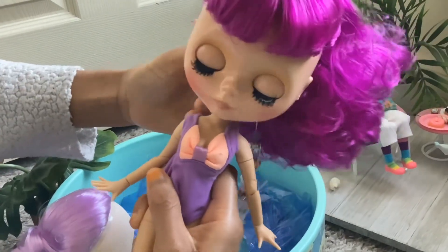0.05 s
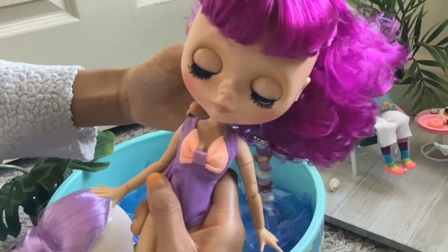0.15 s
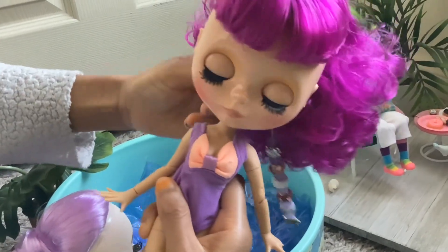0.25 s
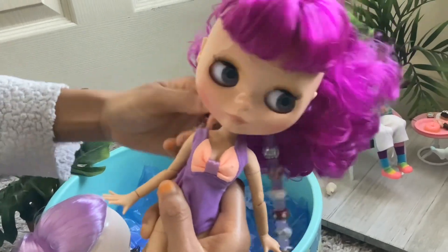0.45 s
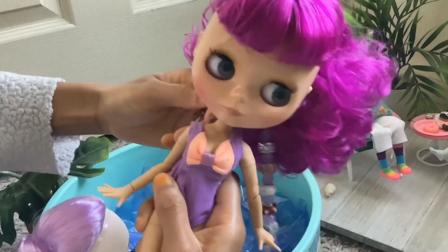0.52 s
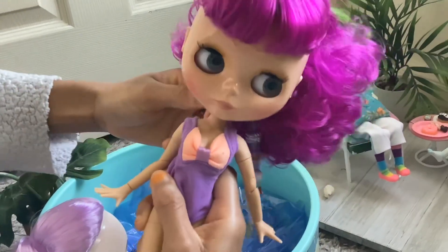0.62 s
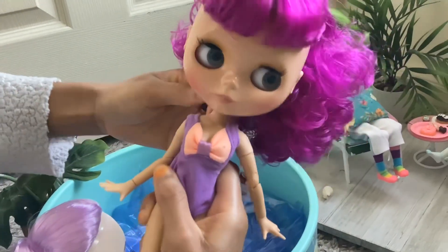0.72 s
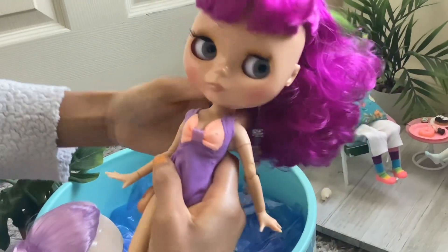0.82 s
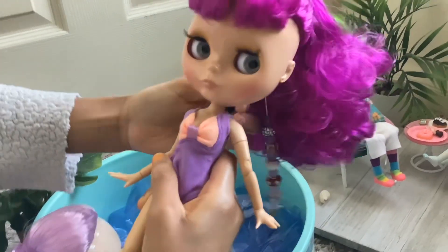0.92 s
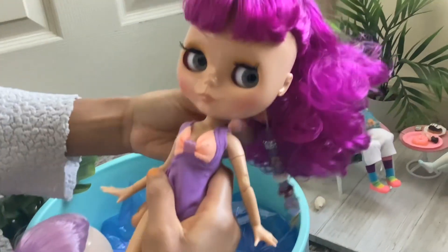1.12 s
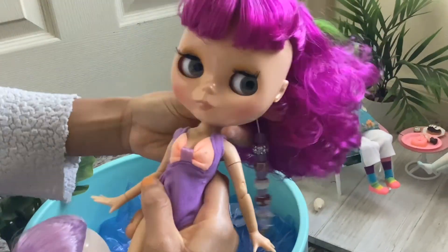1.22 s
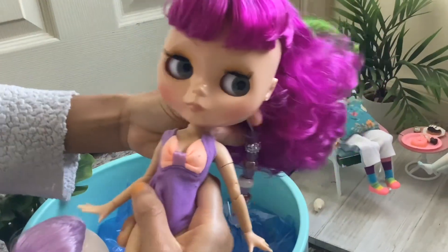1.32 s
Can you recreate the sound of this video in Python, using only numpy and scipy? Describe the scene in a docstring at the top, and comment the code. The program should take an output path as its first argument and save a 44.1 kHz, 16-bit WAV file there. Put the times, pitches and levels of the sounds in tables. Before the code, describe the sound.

Hard plastic clack of a doll's eye mechanism, after faint string ticks and a tiny squeak

```python
"""The eyes of a doll snap open and rattle its hollow head, as a hand pulls the string, close by in a
quiet room. Each contact is a crack, a dying burst of noise and the ringing modes of the shell.
A cam squeaks by stick-slip, a pawl drops back with short pings, and the string ticks and rubs as
noise grains. Light ticks and a soft bump with a sagging pitch follow.
Below lie scattered reflections, shaped noise for the room's rumble and hiss, and a wavering hum."""
import sys
import numpy as np
from scipy import signal
from scipy.fft import rfft, irfft
from scipy.io import wavfile
from scipy.ndimage import uniform_filter1d

SR = 44100
rng = np.random.default_rng(int(sys.argv[2]) if len(sys.argv) > 2 else 0)


def waveform_to_disk(signal):
    """Save audio, clipped to [-1, 1], as 16-bit WAV at the path in sys.argv[1]."""
    frames = np.transpose(np.atleast_2d(signal))
    scaled = np.clip(frames, -1, 1) * 32767
    samples = np.round(scaled).astype(np.int16)
    wavfile.write(sys.argv[1], SR, samples)


N = 59535  # samples, 1.35 s


def amp(db):
    """Level law: decibels to an amplitude gain."""
    return 10 ** (np.asarray(db) / 20)


def unit(x):
    """Energy normalisation: scales the sum of squares to 1."""
    return x / np.sqrt(np.sum(x ** 2) + 1e-20)


def evened(x):
    """Power normalisation: scales the rms to 1."""
    return unit(x) * np.sqrt(x.size)


def read(points, hz):
    """Logarithmic frequency scale: interpolates a spectrum along it."""
    f, value = np.transpose(points)
    return np.interp(np.log(hz + 1), np.log(f + 1), value)


def add(mix, s, sound):
    """Superposition: adds a sound to the mix from time s."""
    part = mix[max(round(s * SR), 0):][:len(sound)]
    part += sound[:len(part)]


def wander(size, hz):
    """Low-passed noise: slow random motion of rms 1, with little above the given rate."""
    f = np.fft.rfftfreq(N, 1 / SR)
    smooth = rfft(rng.standard_normal(N)) / (1 + (f / hz) ** 4)
    return evened(irfft(smooth, N))[:size]


def causal(gain_db):
    """Minimum phase: the Hilbert transform of the log gain gives a response with no pre-echo."""
    log_gain = np.log(amp(np.r_[gain_db, gain_db[-2:0:-1]]))
    return np.exp(np.conj(signal.hilbert(log_gain)))[:len(gain_db)]


# Centres of the five registers that colour a contact, bass to top: frequency [Hz]
REGISTER_HZ = [600, 1500, 5000, 9000, 14000]
# Modes of the hollow head: (frequency [Hz], relative level [dB], T60 [s])
SHELL_MODES = [(628, 6, .036), (690, -7, .04), (1285, -5, .045), (1460, -7, .045), (1522, -5, .045),
               (1785, -2, .05), (2345, -7, .035), (4000, -7, .05), (4730, -6, .04), (5042, -4, .04),
               (5500, -11, .015), (7260, -8, .025), (13650, -5, .006), (14850, -7, .007)]
CONTACT_DB, ATTACK_S = 25.5, 0.00074


def contact(decay, levels_db, crack, ring_db, linger, material, size=8192):
    """Impact excitation: a crack, dense vibration dying by register, and the modal ring of the shell."""
    t, hz = np.arange(size) / SR, np.fft.rfftfreq(size, 1 / SR)
    reference_hz = REGISTER_HZ[2]
    noise, burst = rfft(rng.standard_normal(size)), np.zeros(size)
    for centre, mask in zip(REGISTER_HZ, np.eye(len(REGISTER_HZ))):
        band = read(list(zip(REGISTER_HZ, mask)), hz) > .5
        # a positive linger makes lower registers die more slowly
        life = max(decay, 1e-4) * (reference_hz / centre) ** linger
        envelope = (1 - np.exp(-t / ATTACK_S)) * np.exp(-t / life)
        burst += np.sqrt(band.mean()) * unit(irfft(noise * band) * envelope)
    ring = np.zeros(size)
    for f, db, t60 in SHELL_MODES:
        mode = unit(amp(-60 * t / t60) * np.sin(2 * np.pi * f * t))
        ring += amp(db) * np.sqrt(f / SR) * mode
    body = burst + amp(ring_db) * ring
    body[0] += crack
    tilt = -10 * np.log10(np.maximum(hz, REGISTER_HZ[0]) / reference_hz)  # -3 dB per octave
    colour = read(list(zip(REGISTER_HZ, levels_db)), hz) + read(material, hz) + tilt
    return amp(CONTACT_DB) * irfft(rfft(body) * causal(colour))


# Blows of the eye carriage on the shell, levels relative: (time [s], decay at mid [s], shell ring [dB],
# bass [dB], low-mid [dB], mid [dB], treble [dB], top [dB])
CARRIAGE_BLOWS = [(0.3891, 0.00091, -15.5, -46, -31.5, -55, -53, -67.5),
                  (0.3929, .0012, 13, -52.5, -43.5, -38, -33, -28),
                  (.3928, 0.0029, -13.5, -48, -44, -35.5, -26.5, -22),
                  (.3941, 0.0034, -11.5, -46, -36, -23.5, -30, -31.5),
                  (0.3996, .003, -17, -43, -39.5, -23, -37, -44),
                  (.4015, 0.0044, 3.5, -37.5, -34.5, -37, -51.5, -51.5),
                  (.4045, 0.0032, -12.5, -37.5, -38, -36.5, -59, -52.5),
                  (0.4136, .004, -17, -62, -57.5, -41.5, -50, -51.5)]
# Colour of the eye carriage against the head: (frequency [Hz], relative level [dB])
CARRIAGE_COLOUR = [(100, -26.5), (330, -9), (480, -9), (630, 1), (850, -8), (1080, -6), (1350, -1),
                   (1800, 2), (2700, -9), (3600, -6.5), (4000, -2.5), (4300, -8), (4750, -1), (5550, 4),
                   (6100, -7), (7300, -2.5), (9000, 0), (11500, -3), (14000, 3), (16000, -4)]
BLOW_DB, BLOW_CRACK, BLOW_RING_DB, BLOW_BASS_LINGER = -2.5, 0.16, -1.5, .35


def blows():
    """Repeated impact: the eye carriage hits its stop and rattles, ringing the shell."""
    out = np.zeros(N)
    for s, decay, ring_db, *levels in CARRIAGE_BLOWS:
        blow = contact(decay, levels, BLOW_CRACK, ring_db + BLOW_RING_DB, BLOW_BASS_LINGER, CARRIAGE_COLOUR)
        add(out, s, blow)
    return amp(BLOW_DB) * out


# Course of the cam's squeak: (time [s], pitch [Hz], tone level [dB], singing shell mode level [dB])
SQUEAK_COURSE = [(.353, 1280, -66, -66), (0.361, 1270, -53, -53), (0.366, 1260, -57, -52),
                 (0.368, 1360, -45, -64), (.375, 1365, -51, -64.5), (0.38, 1562, -50.5, -69),
                 (.385, 1590, -63.5, -60), (.390, 1580, -69.5, -62.5)]
# Its partials: (multiple of the pitch, relative level [dB])
SQUEAK_HARMONICS = [(1, 0), (3, -9)]
SHELL_HZ = 5070
PITCH_JITTER, SHELL_JITTER = .025, .008  # rms, as a fraction of the frequency


def squeak():
    """Stick-slip: the cam slips faster as the string tightens, and sets one shell mode singing."""
    t = np.arange(N) / SR
    s, pitch, tone_db, shell_db = np.transpose(SQUEAK_COURSE)
    pitch_hz = np.interp(t, s, pitch) * (1 + PITCH_JITTER * wander(N, hz=596))
    turns = np.cumsum(pitch_hz) / SR
    tone = sum(amp(db) * np.sin(2 * np.pi * round(k) * turns) for k, db in SQUEAK_HARMONICS)
    shell_hz = SHELL_HZ * (1 + SHELL_JITTER * wander(N, hz=500))
    shell = np.sin(2 * np.pi * np.cumsum(shell_hz) / SR)
    sound = tone * amp(np.interp(t, s, tone_db)) + shell * amp(np.interp(t, s, shell_db))
    return np.sqrt(2) * sound * (t > s[0]) * (t < s[-1])


# Colour of the small parts (string, joints, pawl): (frequency [Hz], relative level [dB])
PLASTIC_COLOUR = [(100, -14), (330, -12), (600, -2.5), (1000, -4), (1450, 0.5), (2350, -10), (2850, 1),
                  (3250, -7), (3600, -2), (4100, -7), (4700, -1), (5800, 3), (6400, -8), (9000, 0),
                  (11000, 0.5), (14000, -0.5), (16000, -10.5)]
TICK_CRACK, TICK_RING_DB = 0.52, -24
# Clicks of the pawl, knock levels relative: (time [s], ping [Hz], ping peak [dB], decay at mid [s],
# bass [dB], low-mid [dB], mid [dB], treble [dB], top [dB])
PAWL_CLICKS = [(0.4767, 5140, -33, 0.0021, -44.5, -45.5, -41.5, -52.5, -51),
               (1.2627, 5500, -48.5, 0.0019, -80, -66.5, -50, -71.5, -75),
               (1.306, 5330, -42.5, 0.0025, -44.5, -49.5, -45.5, -61, -65)]
PING_RISE_S, PAWL_BASS_LINGER = 0.00026, 0.56


def pawl(size=600):
    """Damped resonance: the small stiff pawl pings for a millisecond and knocks on the head."""
    out, t = np.zeros(N), np.arange(size) / SR
    swell = t / PING_RISE_S * np.exp(1 - t / PING_RISE_S)
    for s, hz, db, decay, *levels in PAWL_CLICKS:
        add(out, s, amp(db) * swell * np.sin(2 * np.pi * hz * t))
        knock = contact(decay, levels, TICK_CRACK, TICK_RING_DB, PAWL_BASS_LINGER, PLASTIC_COLOUR)
        add(out, s, knock)
    return out


# Light ticks of string and joints, levels relative: (time [s], decay at mid [s],
# bass [dB], low-mid [dB], mid [dB], treble [dB], top [dB])
LIGHT_TICKS = [(0.0167, 0.0027, -46, -44.5, -43, -50, -55), (0.046, 0.0028, -75, -82, -54.5, -54, -55),
               (0.054, .005, -68, -92, -56.5, -60, -62), (0.0968, 0.0023, -85, -82, -74, -65, -65),
               (0.1117, 0.0045, -68, -89, -57.5, -60, -62), (0.1451, 0.0044, -78, -61, -52.5, -47.5, -44),
               (0.186, .006, -78, -55.5, -51, -53, -56), (0.1947, .0045, -85, -57, -47.5, -41.5, -44),
               (0.2112, 0.0053, -65, -63, -46.5, -46, -35),
               (0.2447, 0.0029, -57.5, -46.5, -36.5, -34, -28.5),
               (0.4865, 0.0018, -78, -65.5, -62, -52, -59), (.7785, 0.0039, -72, -63, -65.5, -80.5, -87),
               (1.0141, .002, -59, -77, -71.5, -79, -84), (1.132, .005, -76, -58.5, -67.5, -75, -84),
               (1.2896, 0.005, -76, -70, -60, -78, -92)]
TICK_BASS_LINGER = 0.39


def ticks():
    """Weak impact: light contacts of string and joints barely excite the shell modes."""
    out = np.zeros(N)
    for s, decay, *levels in LIGHT_TICKS:
        tick = contact(decay, levels, TICK_CRACK, TICK_RING_DB, TICK_BASS_LINGER, PLASTIC_COLOUR)
        add(out, s, tick)
    return out


# String sliding through the head: (time [s], level [dB])
RUB_LEVEL = [(0, -88), (.02, -72), (.06, -65.5), (.085, -76), (.135, -81), (0.159, -70), (.18, -73),
             (.192, -58), (.207, -65.5), (.235, -67), (.262, -67.5), (.30, -76), (.348, -73.5), (.366, -58),
             (0.391, -59.5), (.44, -60.5), (.50, -74.5), (.54, -100.5)]
# Colour of the sliding: (frequency [Hz], relative level [dB])
RUB_SPECTRUM = [(300, -12), (1500, 0), (2800, -3.5), (4800, 8), (7000, 0), (11000, -0.5), (15500, -6.5)]
GRIT_PER_S, GRIT_SPREAD_DB = 13000, 1


def rub():
    """Dry friction: the string drags over plastic in a fine grit of tiny random slips."""
    loudness = amp(GRIT_SPREAD_DB * np.minimum(rng.exponential(1, N), 4))
    slips = rng.standard_normal(N) * loudness * (rng.random(N) < GRIT_PER_S / SR)
    grit = irfft(rfft(slips) * amp(read(RUB_SPECTRUM, np.fft.rfftfreq(N, 1 / SR))), N)
    s, level = np.transpose(RUB_LEVEL)
    t = np.arange(N) / SR
    return evened(grit) * amp(np.interp(t, s, level)) * (t < s[-1])


BUMP_S, BUMP_HZ, BUMP_DB, BUMP_RISE_S = 1.131, 592, -51, .004
BUMP_SAG = 0.51  # fraction of the starting pitch that the sag tends to


def bump(size=2600):
    """Soft impact: the hand on the body gives a dull, short knock whose pitch sags."""
    u = np.arange(size) / SR / BUMP_RISE_S
    hz = BUMP_HZ * (1 - BUMP_SAG * (1 - np.exp(-u / 2)))
    return amp(BUMP_DB) * u * np.exp(1 - u) * np.sin(2 * np.pi * np.cumsum(hz) / SR)


# Reverberation: (frequency [Hz], T60 [s], relative level [dB])
ROOM_DECAY = [(303.4, 0.35, -2.5), (1507, 0.42, -5), (3400, 0.36, -2), (5300, 0.26, -3), (9350, 0.18, 2.5),
              (13870, 0.17, -5)]
ROOM_DELAY_S = .007


def room(x):
    """Diffuse reverberation: sparse random reflections of a small room, the treble dying sooner."""
    taps = rng.standard_normal(SR // 2) * (rng.random(SR // 2) < .2)
    hz, t, z = signal.stft(taps, SR, nperseg=256)
    f, t60, db = np.transpose(ROOM_DECAY)
    decay_db = -60 * t / read(np.c_[f, t60], hz)[:, None]
    z = z * amp(read(np.c_[f, db], hz)[:, None] + decay_db)
    reflections = unit(signal.istft(z, SR, nperseg=256)[1])
    out = np.zeros(N)
    add(out, ROOM_DELAY_S, signal.fftconvolve(x, reflections))
    return out


# Spectrum of the room air: (frequency [Hz], relative density [dB per Hz])
AIR_SPECTRUM = [(20, -55.5), (36, -35), (48, -15), (62, -1.5), (80, -1.5), (115, -7.5), (180, -9),
                (260, -13.5), (380, -26), (600, -18.5), (1000, -22), (1450, -23), (2200, -41), (3200, -46),
                (5500, -47.5), (8000, -51.5), (13000, -54.5), (16000, -70.5)]
# Swelling and fading of the hum: (time [s], relative level [dB])
HUM_SWELL = [(0, -3.5), (.27, 0), (.45, -4), (.63, 2.5), (.9, 4), (1.03, -1), (1.15, -8.5), (1.35, -4.5)]
AIR_DB, AIR_PATCH_DB = -57, 1.5
HUM_HZ, HUM_DB, HUM_WAVER = 80, -59, 0.33  # waver: rms, as a fraction of amplitude and as radians of phase


def air():
    """Filtered noise and modulation: low rumble and dull hiss of the room, with a wavering hum."""
    t = np.arange(N) / SR
    hz, _, z = signal.stft(rng.standard_normal(N), SR, nperseg=2048, noverlap=1536)
    # smooth random patches over frequency and time
    patches = uniform_filter1d(rng.standard_normal(z.shape), size=12, axis=0)
    patches = evened(uniform_filter1d(patches, size=5, axis=1))
    z = z * amp(read(AIR_SPECTRUM, hz)[:, None] + AIR_PATCH_DB * patches)
    wash = signal.istft(z, SR, nperseg=2048, noverlap=1536)[1][:N]
    strength = 1 + HUM_WAVER * wander(N, hz=18)
    hum = strength * np.sin(2 * np.pi * HUM_HZ * t + HUM_WAVER * wander(N, hz=4.4))
    swell = amp(np.interp(t, *np.transpose(HUM_SWELL)))
    return amp(AIR_DB) * evened(wash) + amp(HUM_DB) * evened(hum) * swell


SNAP_ROOM_DB, LIGHT_ROOM_DB = -17, -12  # reverberant relative to direct level


def scene():
    """Superposition: direct sound of the sources, their reverberation and the room air."""
    snap = blows() + squeak()
    light = ticks() + rub() + pawl()
    add(light, BUMP_S, bump())
    echoes = room(amp(LIGHT_ROOM_DB) * light + amp(SNAP_ROOM_DB) * snap)
    return (light + snap + echoes + air())[None]


LOW_CUT_HZ, EDGE_HZ = 46, 16000


def record(dry):
    """Band limiting: a low cut, then a linear-phase treble limit."""
    low_cut = signal.butter(4, LOW_CUT_HZ, "high", fs=SR, output="sos")
    treble_limit = signal.firwin(201, EDGE_HZ, window=("kaiser", 8), fs=SR)
    return signal.oaconvolve(signal.sosfilt(low_cut, dry), treble_limit[None], "same")


dry = scene()
out = record(dry)
waveform_to_disk(out)
```